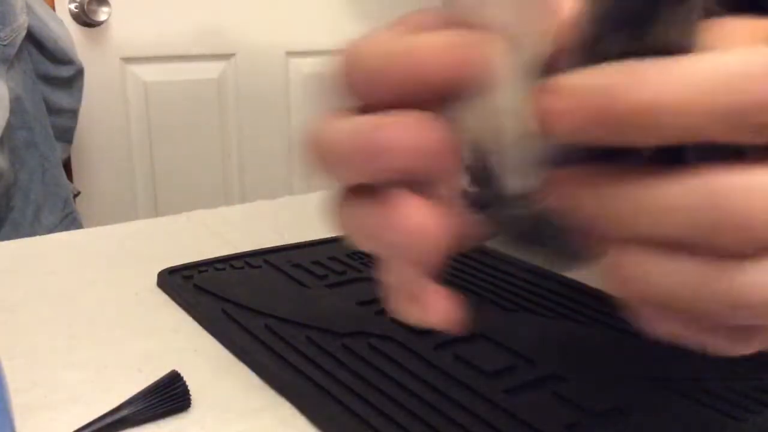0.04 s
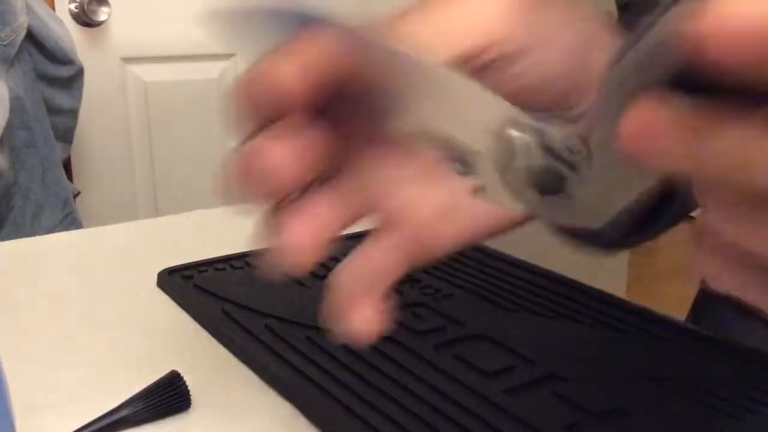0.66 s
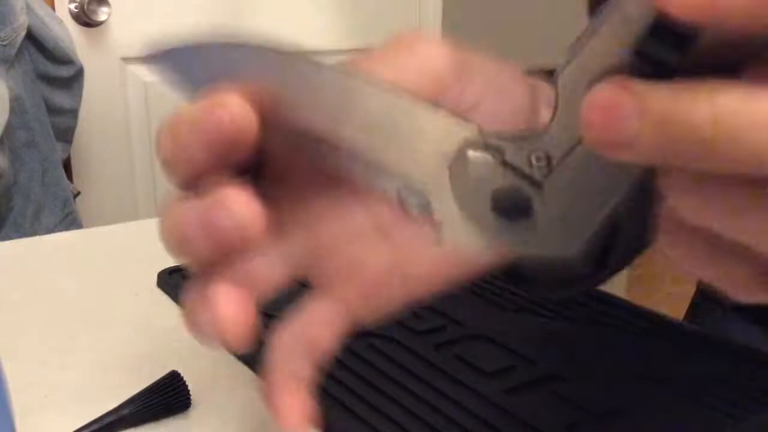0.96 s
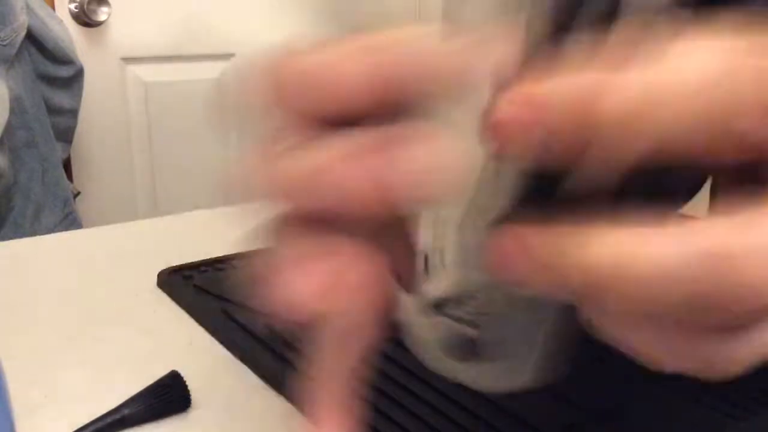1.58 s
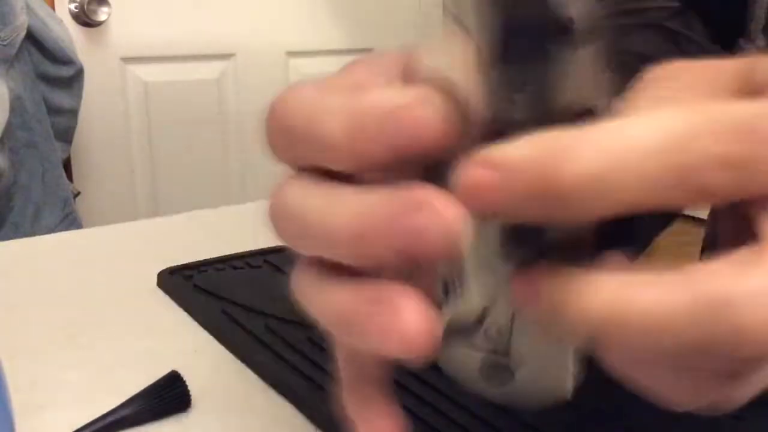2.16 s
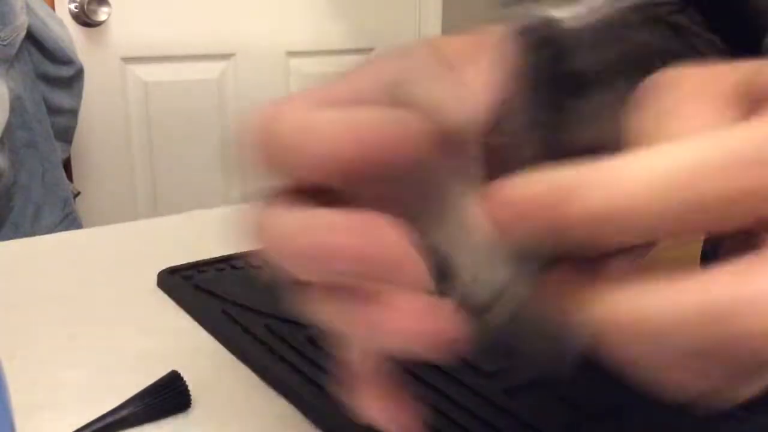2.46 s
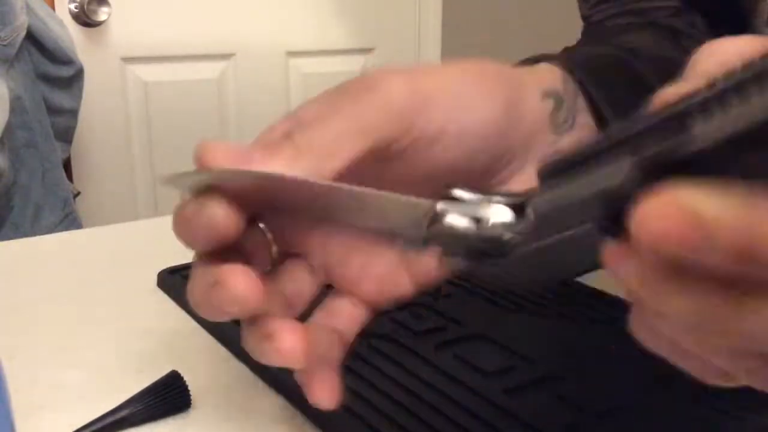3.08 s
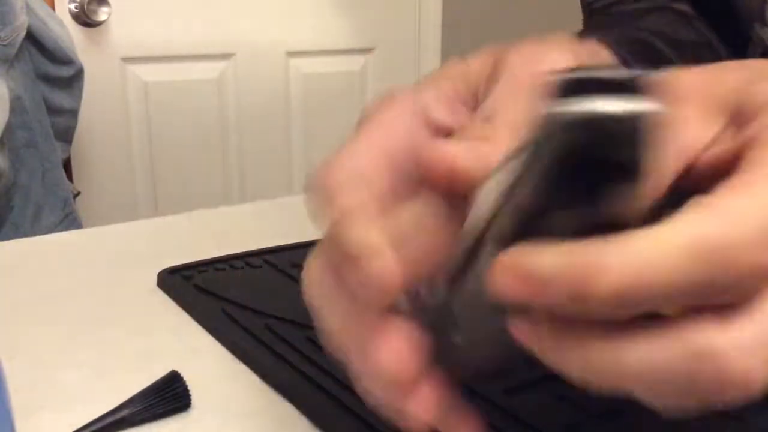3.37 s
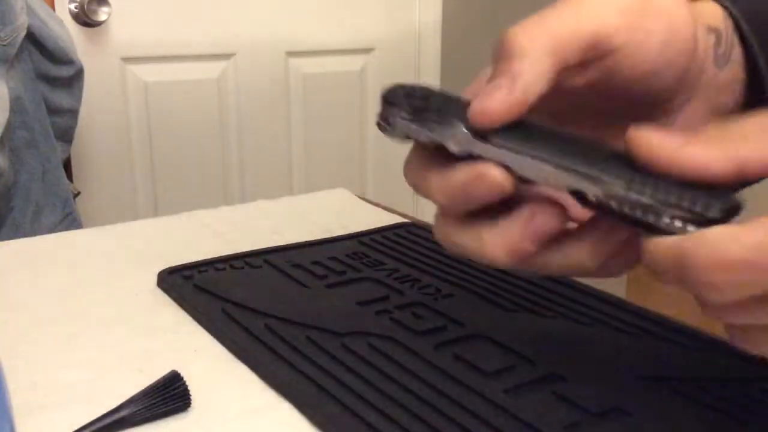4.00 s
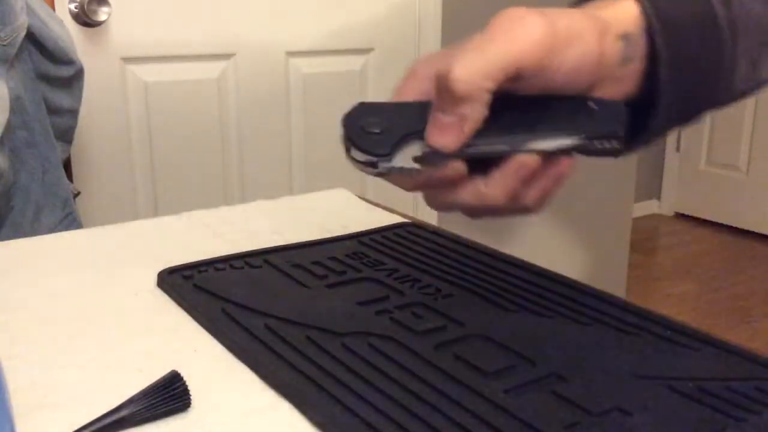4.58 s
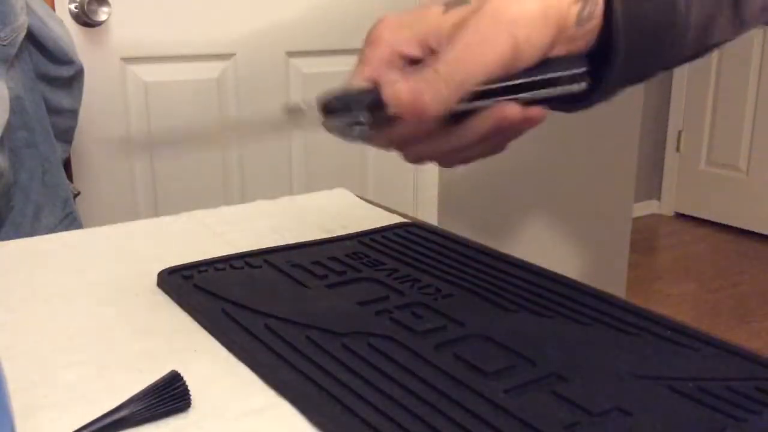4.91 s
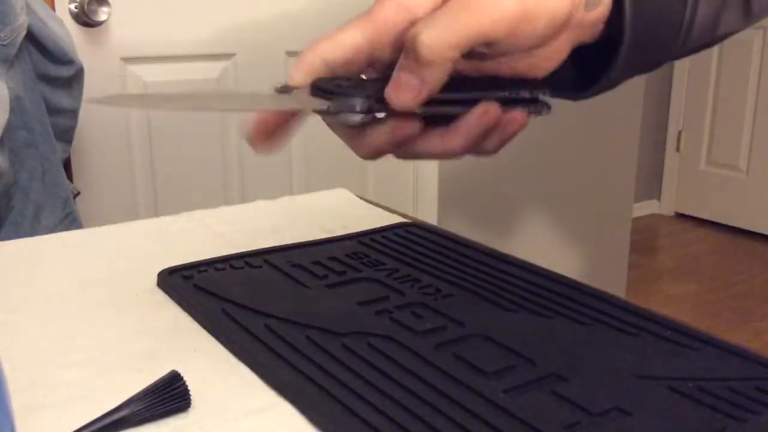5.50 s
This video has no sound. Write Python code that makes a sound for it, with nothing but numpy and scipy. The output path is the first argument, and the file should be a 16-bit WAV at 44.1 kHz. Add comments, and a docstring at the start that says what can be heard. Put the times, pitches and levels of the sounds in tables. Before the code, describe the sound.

Close to the microphone, the blade of a steel folding knife is rocked back and forth on its pivot, making a faint, rhythmic hiss with light ticks. It snaps shut with a sharp click. Fingers slide softly on the handle, then the knife is flipped open a little farther away, locking with a crisp snap and a faint ring. A low ventilation hum fills the small, quiet room.

```python
"""A steel folding knife is worked in a small, quiet room over a low ventilation hum.
For three seconds, close by, the blade is rocked on its pivot and hisses by friction on the detent ball;
light contacts tick and skin slides on the handle. At 3.4 s the blade snaps shut, exciting brief modes.
At 4.9 s it is flipped open at arm's length: the detent lets go, the blade strikes its stop and locks,
and the steel rings on faintly while the room reverberates."""
import sys
import numpy as np
from scipy import signal
from scipy.fft import rfft, irfft, next_fast_len
from scipy.io import wavfile
from scipy.ndimage import map_coordinates

SR = 44100
rng = np.random.default_rng(int(sys.argv[2]) if len(sys.argv) > 2 else 0)


def waveform_to_disk(signal):
    """Save audio, clipped to [-1, 1], as 16-bit WAV at the path in sys.argv[1]."""
    frames = np.transpose(np.atleast_2d(signal))
    scaled = np.clip(frames, -1, 1) * 32767
    samples = np.round(scaled).astype(np.int16)
    wavfile.write(sys.argv[1], SR, samples)


N = 249165

# spectrum of contact noise on steel: f/Hz, relative level/dB
STEEL_SPECTRUM = [(100, -27), (700, -25), (2200, -18.5), (3300, -22.5), (4400, -9.5), (5200, -9.5),
                  (6000, -1), (7200, -6.5), (8200, -0.5), (10000, 1.5), (12300, -0.5), (14000, 0.5),
                  (15000, -0.5)]


def amp(db):
    """Amplitude ratio of a level in decibels."""
    return 10 ** (np.asarray(db) / 20)


def unit(x):
    """Normalisation to an rms of 1."""
    return x / np.sqrt(np.mean(x ** 2) + 1e-20)


def along(points, hz):
    """Interpolation of (f/Hz, value) points on a logarithmic frequency axis."""
    f, values = np.transpose(points)
    return np.interp(np.log(hz + 1), np.log(f), values)


def filtered(x, response):
    """Linear filtering: the spectrum is multiplied by a frequency response."""
    size = next_fast_len(len(x) + 8192)
    return irfft(rfft(x, size) * response(np.fft.rfftfreq(size, 1 / SR)), size)[:len(x)]


def noise(spectrum, size):
    """Spectral shaping of white noise, at an rms of 1."""
    return unit(filtered(rng.standard_normal(size), lambda hz: amp(along(spectrum, hz))))


def wobble(rate):
    """Smooth random modulation: a spline through `rate` knots a second."""
    knots = rng.standard_normal(int(N * rate / SR) + 4)
    return map_coordinates(knots, [np.arange(N) * rate / SR])


def add(track, start_s, sound):
    """Superposition of a sound on the track."""
    part = track[round(start_s * SR):][:len(sound)]
    part += sound[:len(part)]


def ventilation(air_db=-60.5, waver_db=2, drift_cycles=0.29):
    """Broadband flow noise plus motor tones, slightly modulated in level and phase."""
    air_spectrum = [(20, -27.5), (38, -16.5), (52, -6), (90, -4.5), (150, 1.5), (250, -3.5), (420, -9.5),
                    (1100, -22), (1700, -31), (3200, -37.5), (6500, -39), (9000, -38), (15000, -39)]  # rush of air: f/Hz, relative level/dB
    motor_tones = [(59, -77), (120, -65.5), (268, -74.5), (394, -74.5)]  # f/Hz, rms level/dB
    t = np.arange(N) / SR
    hum = np.zeros(N)
    for hz, db in motor_tones:
        peak = np.sqrt(2) * amp(db + waver_db * wobble(5))
        hum += peak * np.sin(2 * np.pi * (hz * t + drift_cycles * wobble(4)))
    return amp(air_db) * noise(air_spectrum, N) + hum


def room(x, gap_s, build_s):
    """Reverberation: a diffuse field builds up after a gap and lasts longest at 2 to 6 kHz."""
    decay_times = [(200, 0.16), (2000, .34), (5500, .36), (8000, .3), (11000, .26), (15000, .22)]  # reverberation time: f/Hz, T60/s
    wall_spectrum = [(200, -8), (1000, 5), (2300, 2.5), (3200, 2), (4300, 1.5), (6000, -6.5), (8200, -1),
                     (11000, -2.5), (15000, -1.5)]  # colour of the reflections: f/Hz, relative level/dB
    hz, t, spectra = signal.stft(rng.standard_normal(SR // 2), SR, nperseg=256)
    decay = amp(-60 * t / along(decay_times, hz)[:, None])
    tail = signal.istft(spectra * decay, SR, nperseg=256)[1]
    tail = filtered(tail, lambda f: amp(along(wall_spectrum, f)))
    since_gap = np.maximum(np.arange(len(tail)) / SR - gap_s, 0)
    tail *= 1 - np.exp(-(since_gap / build_s) ** 2)
    return signal.fftconvolve(x, tail / np.linalg.norm(tail))[:N]


def all_round(source, ring_db, crack_db, directions=3):
    """Directivity: the knife radiates differently each way, so its modes blur in the reverberation."""
    tails = (room(source(ring_db, crack_db), gap_s=.006, build_s=.017) for _ in range(directions))
    return sum(tails) / np.sqrt(directions)


def early_reflection(x, delay_s, spread_s):
    """Scattering from the table top and hands returns a delayed, smeared copy."""
    t = np.arange(SR // 20) / SR
    scatter = rng.standard_normal(len(t)) * np.exp(-np.abs(t - delay_s) / spread_s)
    return signal.fftconvolve(x, scatter / np.linalg.norm(scatter))[:N]


def ring(modes, rise_s):
    """Damped modes build up while the contact lasts, then decay exponentially."""
    t = np.arange(SR // 2) / SR
    partials = sum(amp(db - 60 * t / t60) * np.sin(2 * np.pi * (hz * t + rng.random()))
                   for hz, db, t60 in modes)
    return partials * (1 - np.exp(-(t / rise_s) ** 2))


def crack(rise_s, hold_s, t60_s):
    """Impact noise: steel faces chatter for a moment in a broadband burst."""
    t = np.arange(SR // 2) / SR
    attack = 1 - np.exp(-(t / rise_s) ** 2)
    decay = amp(-60 * np.maximum(t - hold_s, 0) / t60_s)
    return noise(STEEL_SPECTRUM, len(t)) * attack * decay


def sliding(grain_db=3):
    """Sliding friction on steel and handle gives grainy noise in Gaussian swells."""
    # fingertips on the steel, blade sweeping in and out: centre t/s, half length/s, level/dB
    slides = [(3.3, .05, -75.5), (3.619, .02, -74), (3.676, 0.0307, -72.5), (3.955, 0.0257, -72),
              (4.057, 0.116, -79.5), (4.199, 0.021, -70.5), (4.905, .018, -64.5), (5.452, 0.0138, -72)]
    grips = [(.15, 0.33, -77.5), (3.3, .12, -78.5), (3.66, 0.18, -77), (4.06, .12, -75)]  # palms shifting on the handle: centre t/s, half length/s, level/dB
    skin_spectrum = [(300, -12), (1000, -3.5), (1500, 2.5), (2400, 0), (3200, -6), (4200, -6), (6000, -14),
                     (15000, -17.5)]  # friction of the palms: f/Hz, relative level/dB
    friction = np.zeros(N)
    for strokes, spectrum in (slides, STEEL_SPECTRUM), (grips, skin_spectrum):
        t = np.arange(N) / SR
        envelope = sum(amp(db) * np.exp(-((t - centre) / half) ** 2) for centre, half, db in strokes)
        friction += envelope * unit(noise(spectrum, N) * amp(grain_db * wobble(400)))
    return friction


def ticks(gain_db=-7):
    """Light impacts of detent, lock bar and flipper excite the modes of the handle."""
    contacts = [(0.539, -54, -10), (.675, -50.5, -12.5), (1.0424, -58, -4), (1.191, -55, -5),
                (1.4314, -51.5, -5.5), (2.1393, -47.5, -14), (3.2404, -56, -1.5), (3.372, -50, -20),
                (3.907, -44.5, -6.5), (4.2009, -55, -8), (4.939, -39, -7), (5.4476, -53, -15)]  # t/s, relative level/dB, handle knock re contact/dB
    handle_modes = [(1500, -6.5, .02), (2400, -3.5, .025), (3950, -2, .02), (5750, 0.5, .02)]  # f/Hz, relative level/dB, T60/s
    track = np.zeros(N)
    for start_s, db, knock_db in contacts:
        click = crack(rise_s=.00023, hold_s=.001, t60_s=.014)
        knock = amp(knock_db) * ring(handle_modes, rise_s=.0005)
        add(track, start_s, amp(db + gain_db) * (click + knock))
    return track


def pivot(gain_db=-2, return_db=2.6, grain_db=2.3, vary_db=2.2):
    """Friction of the detent ball drives the blade's resonances, loudest at the speed peak of a swing."""
    resonances = [(2111, 400, -12.5), (3800, 440, -18), (5413, 970, -15.5), (7057, 820, -10.5),
                  (9100, 680, -0.5), (10383, 1100, -9), (11470, 1200, -2.5), (13000, 1500, -8),
                  (14850, 900, -12)]  # rubbed blade: f/Hz, bandwidth/Hz, relative level/dB
    pressure = [(0, -65), (.68, -65.5), (.84, -68.7), (1.35, -71), (1.62, -70.3), (1.76, -66.3),
                (2.7, -68.3), (3.23, -68.3)]  # hand's load on the pivot: t/s, relative rubbing level/dB
    start_s, swing_s, swings = -0.053, 0.1339, 25
    length_s = swing_s * 1.03  # swings overlap slightly
    t = np.arange(N) / SR
    rubbing = np.zeros(N)
    grain = amp(grain_db * wobble(250))
    for k, grip in enumerate(rng.standard_normal((swings, len(resonances)))):
        def blade_response(f):
            """Resonances add in power; each new grip shifts their weights."""
            return np.sqrt(sum(amp(peak + vary_db * shift) ** 2 / (1 + (2 * (f - hz) / width) ** 2) ** 2
                               for (hz, width, peak), shift in zip(resonances, grip)))

        middle_s = start_s + (k + .5) * swing_s
        during = np.abs(t - middle_s) < length_s / 2
        speed = np.abs(np.cos(np.pi * (t[during] - middle_s) / length_s))
        db = np.interp(middle_s, *np.transpose(pressure)) + return_db * (k % 2)  # returns rub harder
        friction = unit(filtered(rng.standard_normal(len(speed)) * grain[during], blade_response))
        rubbing[during] += amp(db + gain_db) * speed ** 1.4 * friction
    return rubbing


def closing(ring_db, crack_db):
    """Impact excitation: the ball drops into its hole and pulls the blade against the stop pin."""
    shut_modes = [(1397, -40.5, 0.024), (2915.7, -26, .007), (3924, -20.5, 0.012), (5730, 1.5, 0.0063),
                  (7424, 0.5, .007), (9650, 4, 0.0057), (10593, -4.5, .008), (11900, -8.5, 0.011),
                  (13530, -1, .006)]  # knife with the blade in the handle: f/Hz, relative level/dB, T60/s
    snap = np.zeros(N)
    add(snap, 3.3935, amp(-27) * crack(rise_s=.0007, hold_s=.0016, t60_s=.0165))  # ball drops
    add(snap, 3.3951, amp(ring_db) * ring(shut_modes, rise_s=.00037))
    add(snap, 3.3951, amp(crack_db) * crack(rise_s=.00039, hold_s=.00066, t60_s=.0046))
    return snap


def opening(ring_db, crack_db):
    """Impact and free vibration: the released blade hits its stop, locks and sings on."""
    open_modes = [(726, -35, 0.027), (1160.4, -33.5, 0.042), (1480, -27.5, 0.031), (1933, -24.5, .025),
                  (2280, -19.5, .02), (2704, -27, 0.03), (4135, -16, 0.027), (5816, 9, 0.0056),
                  (6395, -15.5, .012), (7936, -7.5, 0.024), (8430, -11, 0.021), (9730, 0.5, 0.0171),
                  (10500, -1, .014), (11000, -5.5, .013), (11600, -1, 0.018), (12900, -3.5, .013),
                  (13760, 2, .012), (15000, -4.5, .014)]  # knife with the blade out: f/Hz, relative level/dB, T60/s
    blade_modes = [(5703, -9, 0.39), (8102, -1.5, .25), (9027, -3, .25), (10238, -2, .22), (11694, -5, .22),
                   (12856, -3.5, .25), (13065, -13, .22), (13964, -2, .22), (14600, -6, .18)]  # lightly damped free blade: f/Hz, relative level/dB, T60/s
    snap = np.zeros(N)
    add(snap, 4.9292, amp(-25.5) * crack(rise_s=.0011, hold_s=.00166, t60_s=.011))  # detent lets go
    add(snap, 4.9532, amp(ring_db) * ring(open_modes, rise_s=.00027))
    add(snap, 4.9532, amp(crack_db) * crack(rise_s=.0006, hold_s=.0013, t60_s=.012))
    add(snap, 4.9535, amp(-46.5) * ring(blade_modes, rise_s=.001))
    return snap


def scene():
    """The direct-to-reverberant ratio falls with distance: nearly dry close by, roomy at arm's length."""
    handling = pivot() + ticks() + sliding()
    near = handling + closing(ring_db=-11, crack_db=-17.5)
    near += amp(-23) * early_reflection(near, delay_s=.009, spread_s=.004)
    far = opening(ring_db=-15, crack_db=-14.5)
    far += amp(-13) * early_reflection(far, delay_s=.00854, spread_s=.0046)
    reverberation = amp(-17) * room(handling, gap_s=.005, build_s=.016)
    reverberation += amp(-20) * all_round(closing, ring_db=-19, crack_db=-12.5)
    reverberation += amp(-8.5) * all_round(opening, ring_db=-18.5, crack_db=-13.5)
    return (near + far + reverberation + ventilation())[None]


def record(dry):
    """Band limiting: a steep low-pass removes the highest treble."""
    cutoff_hz = 15400
    return np.array([filtered(x, lambda hz: 1 / np.sqrt(1 + (hz / cutoff_hz) ** 160)) for x in dry])


dry = scene()
out = record(dry)
waveform_to_disk(out)
```